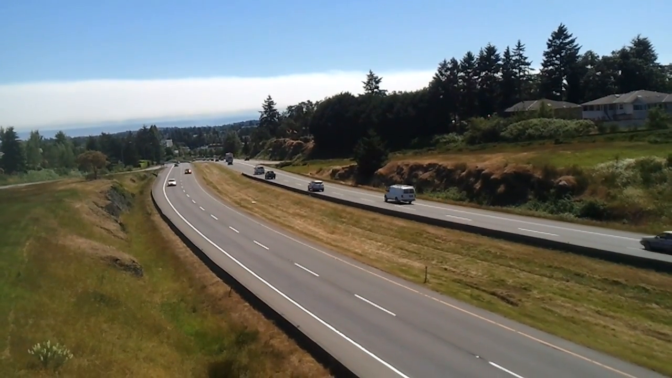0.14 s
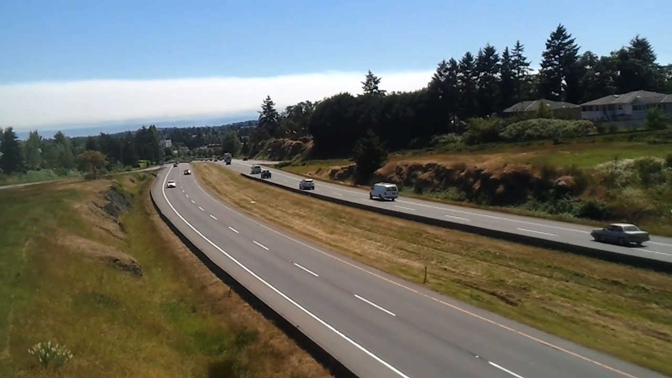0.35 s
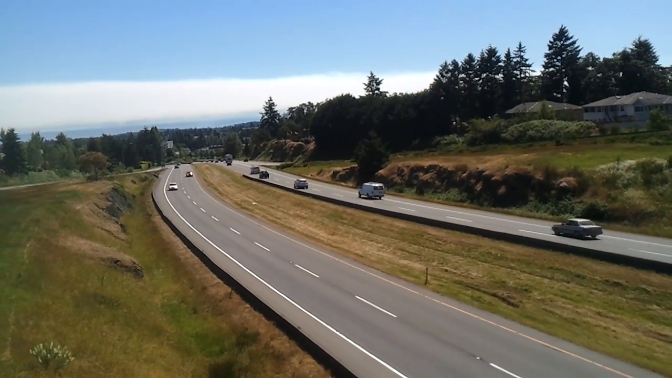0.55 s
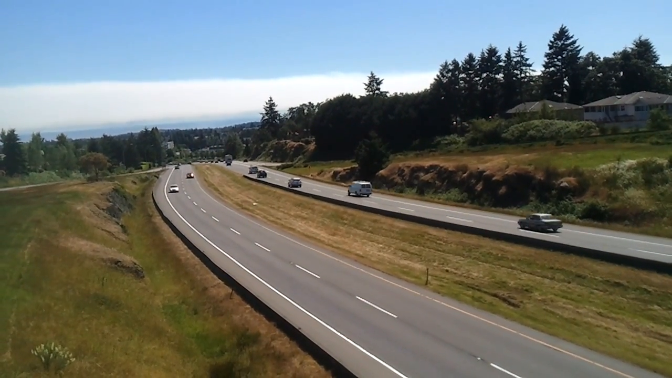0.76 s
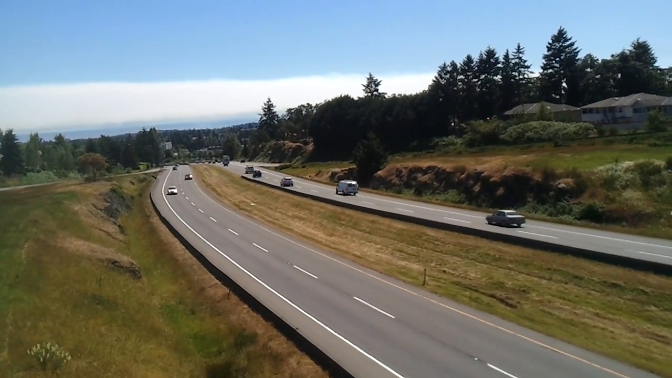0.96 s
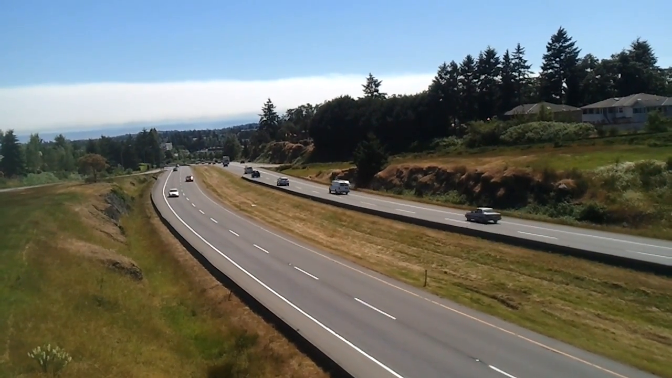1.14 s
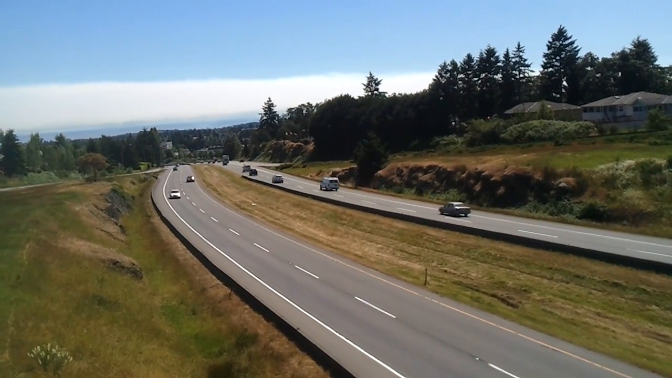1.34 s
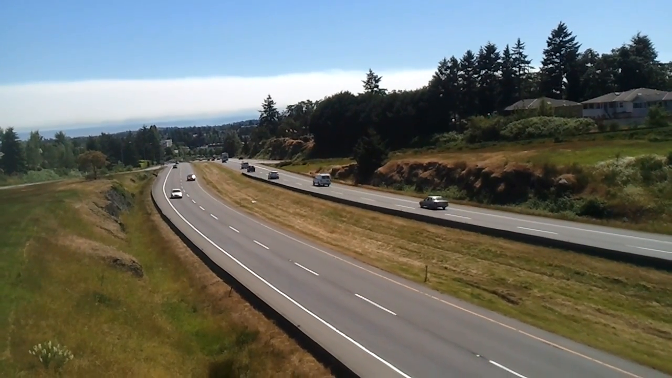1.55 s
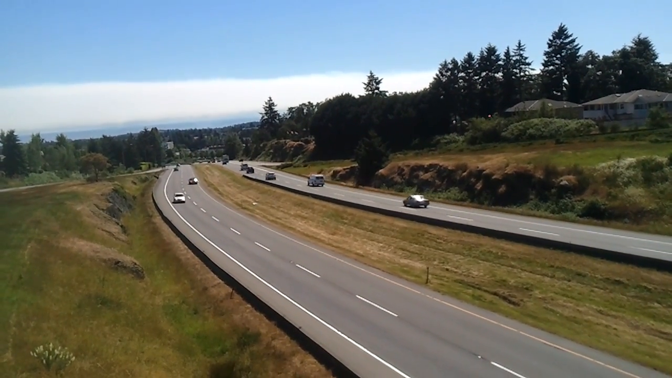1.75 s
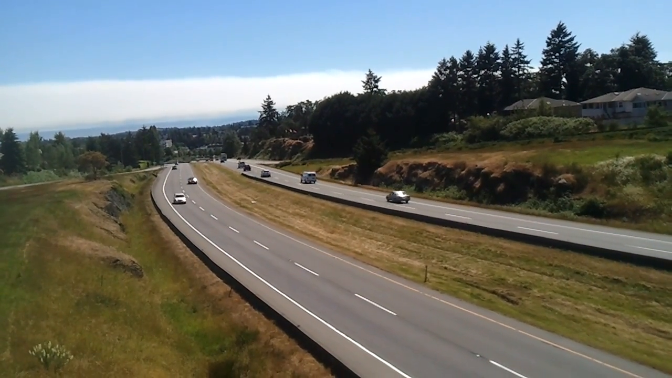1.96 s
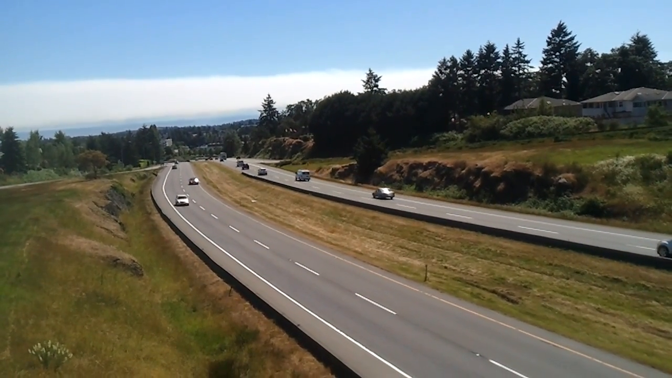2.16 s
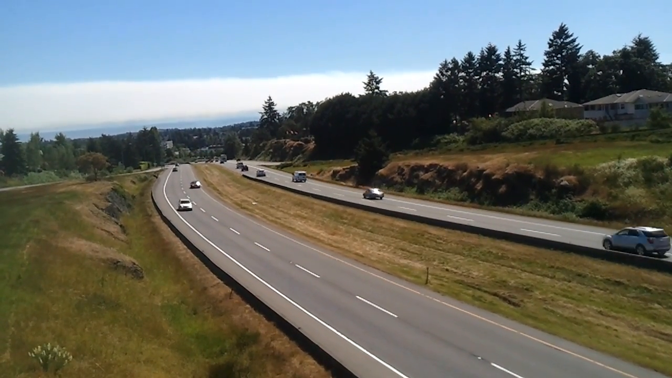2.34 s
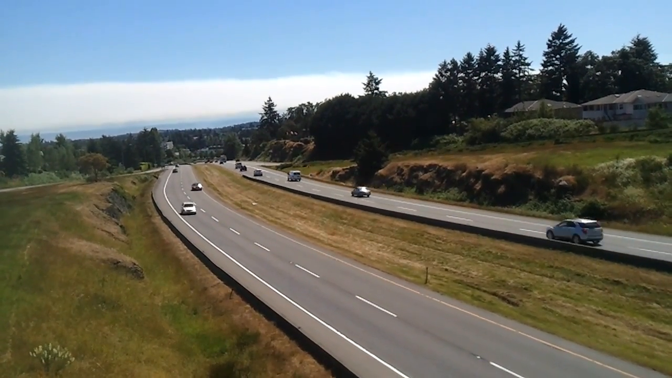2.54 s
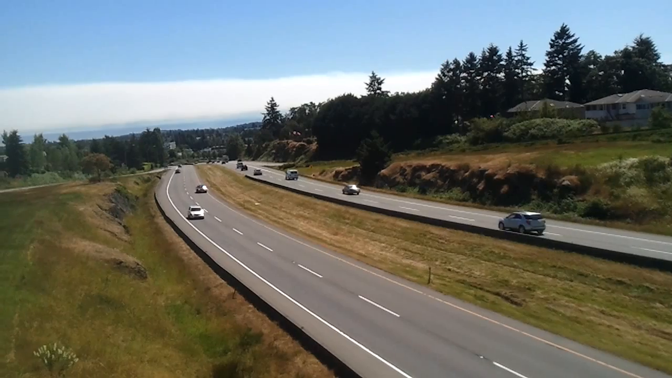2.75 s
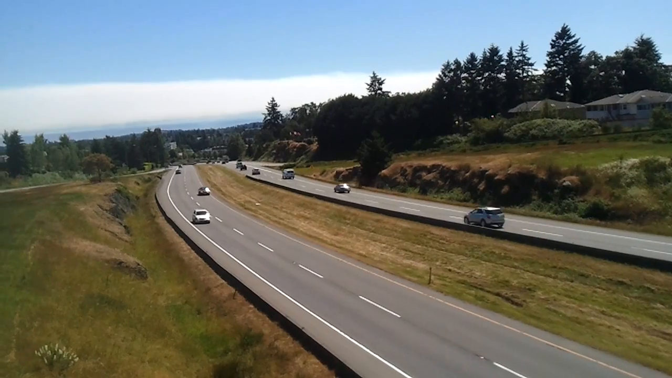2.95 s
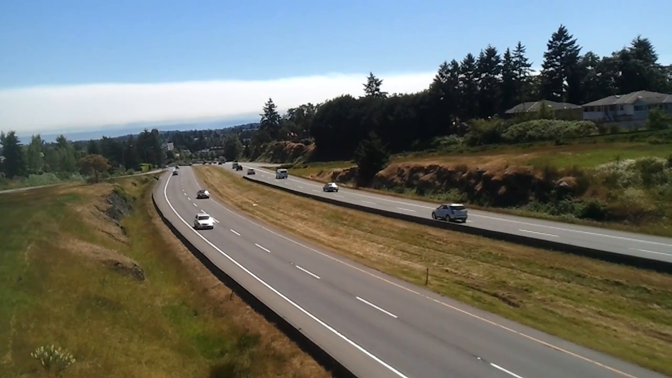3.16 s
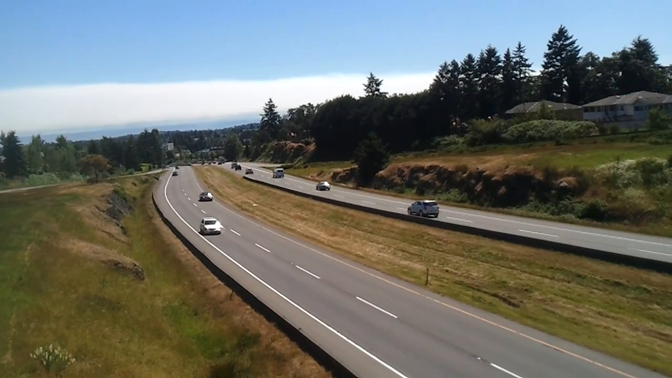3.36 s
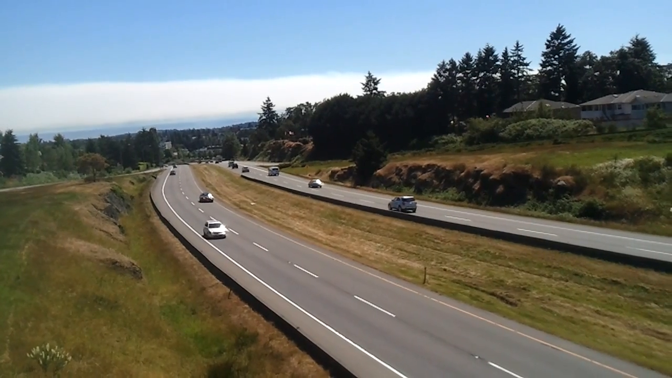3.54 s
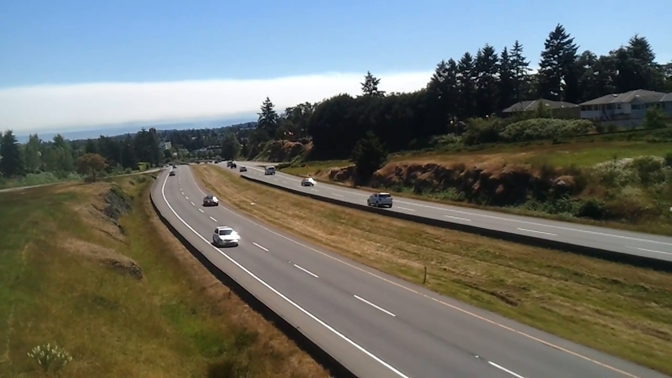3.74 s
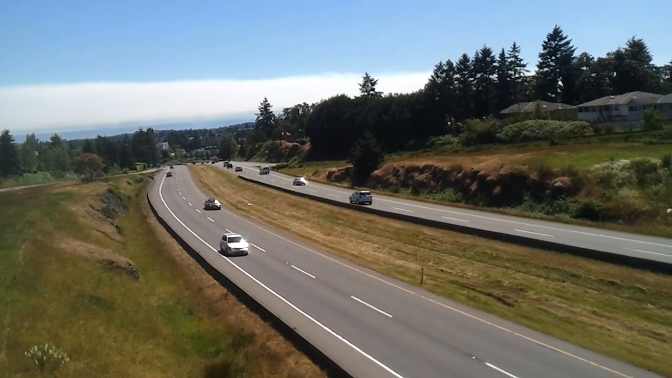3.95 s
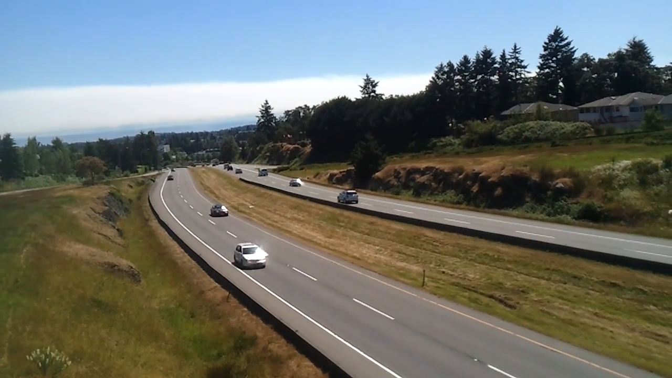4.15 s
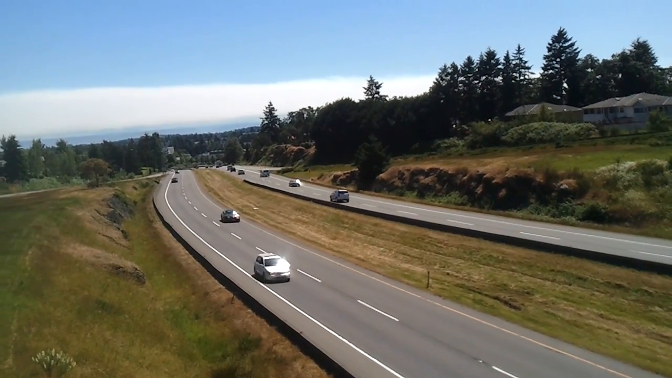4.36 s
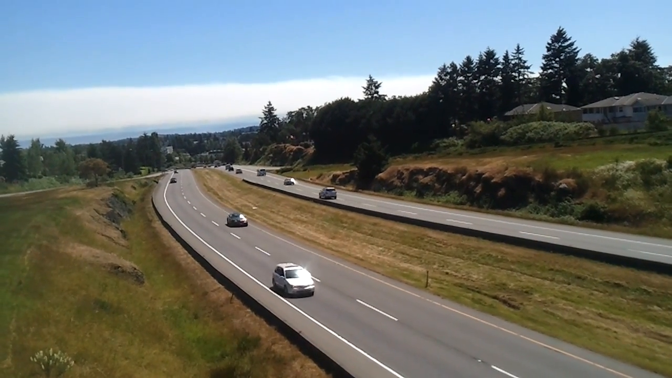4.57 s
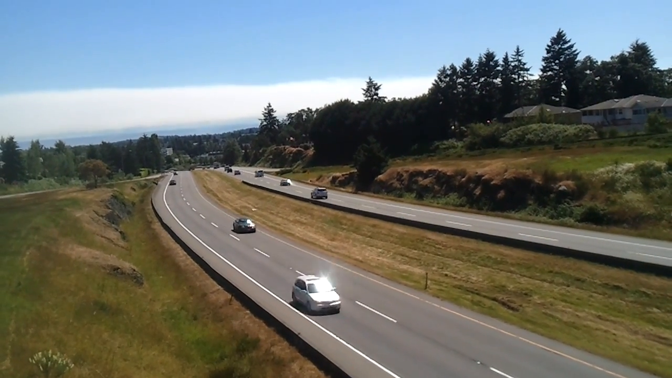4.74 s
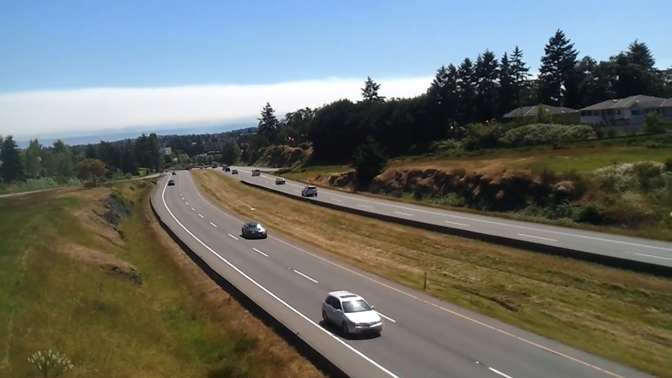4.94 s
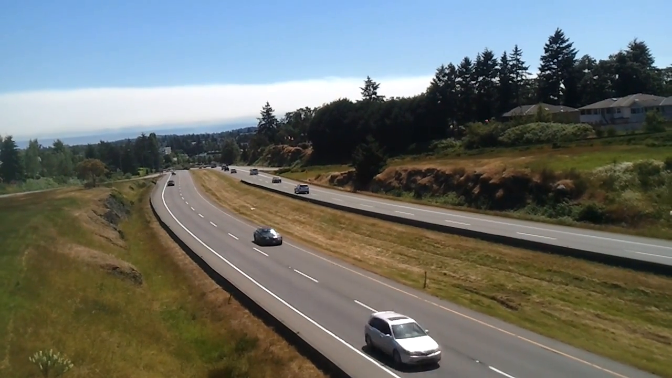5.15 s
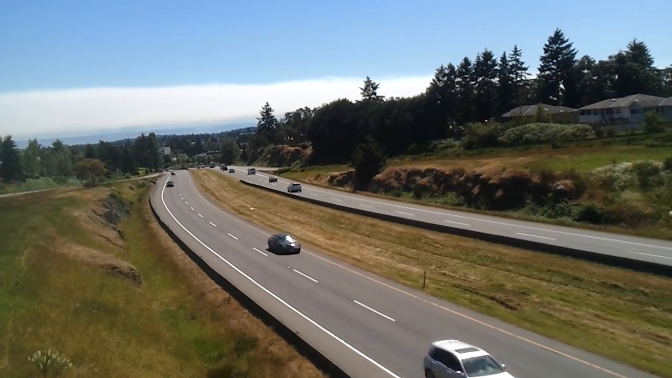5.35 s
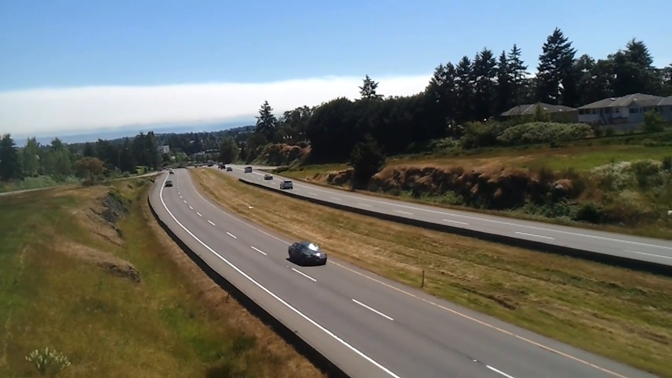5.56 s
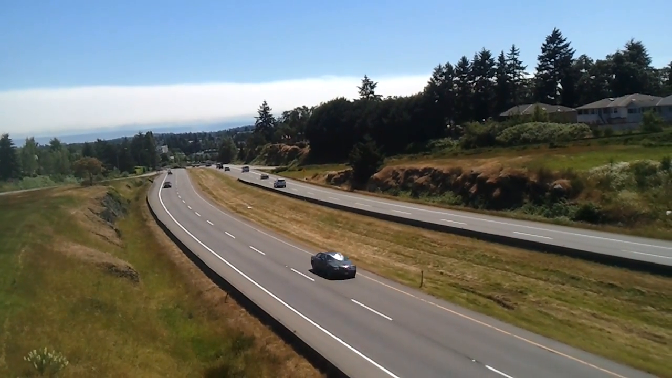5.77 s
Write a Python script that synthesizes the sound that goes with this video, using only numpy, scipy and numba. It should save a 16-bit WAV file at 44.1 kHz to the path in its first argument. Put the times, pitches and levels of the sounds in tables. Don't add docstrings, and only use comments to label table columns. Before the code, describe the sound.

A steady, broad wash of road noise from many cars, heard from a bridge over the road. A quick pass opens, a slower one follows near two seconds, then stronger tyre hiss later. Faint airy rustles come early. Low, blunt wind knocks strike the bare microphone throughout, thickening into rough, clipped buffeting in the second half.

```python
import sys
import numpy as np
from scipy import signal
from scipy.fft import rfft, irfft
from scipy.io import wavfile
from scipy.ndimage import uniform_filter1d
from numba import njit

SR = 44100
rng = np.random.default_rng(int(sys.argv[2]) if len(sys.argv) > 2 else 0)


def persist_wave(psi):
    counts = np.round(np.clip(psi, -1, 1) * 32767).astype(np.int16)
    wavfile.write(sys.argv[1], SR, np.atleast_2d(counts).T)


def boost_factor(decibels):
    exponent = np.asarray(decibels, float) / 20
    return 10 ** exponent


N = 255780
TIME = np.arange(N) / SR

# time_s, level_db
GUST = [(0, -27), (.27, -29), (.4, -20), (.8, -26), (1.85, -24.5), (2.36, -22.5), (2.6, -17.5), (2.79, -23),
        (3.1, -20.5), (3.33, -24.5), (3.9, -16.5), (4.15, -22), (4.35, -16.5), (4.56, -19.5), (4.95, -15.5),
        (5.45, -15.5), (5.68, -22.5), (5.8, -22.5)]
# start_s, front_db, swell_db, swell_ms
SNAPS = [(0.449, -14, -7, 7.8), (0.623, -11, -12.5, 18), (1.046, -8, -9, 22.4), (1.345, -4, -10, 18),
         (1.37, -12, -9, 12), (1.688, -4.5, -14, 15), (2.53, -12, -12.5, 26), (2.611, -1.5, -10.5, 13),
         (2.658, -19.5, -6, 10), (3.218, -18, -9, 13), (3.254, -3.5, -1.5, 21), (3.555, -0.5, -9, 9.2),
         (3.677, -2, -11.5, 14), (3.754, -2.5, -2.5, 8.4), (3.782, -2.5, -9, 25.5), (3.85, -4, -4, 8.6),
         (3.914, -8, -9.5, 10), (4.202, 0, -5, 14), (4.245, -12, -4, 15), (4.336, -7.5, -3, 9),
         (4.422, -5.5, -6, 35), (4.484, -0.5, -7.5, 8), (4.603, -0.5, -10, 18), (4.787, -14, -10.5, 8.9),
         (5.018, -3, -3.5, 11), (5.056, -1.5, -3.5, 8.1), (5.168, -9.5, -10, 8.3), (5.235, 0.5, -1, 14),
         (5.377, 5.5, -7, 18), (5.528, -1.5, -5.5, 12)]
FRONT_HZ = 540


def level(x, db):
    return x * boost_factor(db) / np.sqrt(np.mean(x ** 2))


@njit
def svf(x, hz, width):
    y = np.empty(len(x))
    band, low = 0., 0.
    for i in range(len(x)):
        g = np.tan(np.pi * hz[i] / SR)
        damping = width[i] / hz[i]
        v = (band + g * (x[i] - low)) / (1 + g * (g + damping))
        band, low = 2 * v - band, low + 2 * g * v
        y[i] = damping * v
    return y


def walk(rate):
    hold = int(SR / rate)
    steps = rng.standard_normal(N // 100)[np.arange(N) // hold]
    smooth = uniform_filter1d(uniform_filter1d(steps, hold), hold)
    return smooth / smooth.std()


def rush(spectrum, flicker_db):
    hz, db = np.transpose(spectrum)
    f = np.maximum(np.fft.rfftfreq(N, 1 / SR), 1)
    below = -12 * np.maximum(np.log2(hz[0] / f), 0)
    above = -60 * np.maximum(np.log2(f / hz[-1]), 0)
    colour_db = np.interp(np.log(f), np.log(hz), db) + below + above
    noise = rfft(rng.standard_normal(N)) * boost_factor(colour_db)
    octave = np.clip(np.log2(f / 125), 0, 6)
    total = np.zeros(N)
    for k in range(7):
        band = irfft(noise * np.maximum(1 - abs(octave - k), 0), N)
        total += band * boost_factor(flicker_db * walk(13))
    return level(total, 0)


def passes():
    # nearest_s, approach_s, retreat_s, hiss_db, tread_db
    cars = [
        (.13, 0.072, 0.054, -30.5, -23.5),
        (1.749, 0.58, .4, -33, -29.5),
        (2.3, 0.13, 0.18, -30.5, -32.5),
        (3.7, 0.37, .5, -22, -31),
        (4.35, 0.23, 0.16, -24.5, -28.5),
        (5.25, 0.31, 0.48, -27.5, -14.5),
        (5.75, .2, .3, -22, -20.5),
    ]
    s, come, go, hiss_db, tread_db = np.transpose(cars)[:, :, None]
    near = 1 / (1 + ((TIME - s) / np.where(TIME < s, come, go)) ** 2)
    hiss_power = np.sum(boost_factor(2 * hiss_db) * near, axis=0)
    tread_power = np.sum(boost_factor(2 * tread_db) * near, axis=0)
    far_db = -25 + 3 * near[-2:].max(axis=0)
    return far_db, 10 * np.log10(hiss_power), 10 * np.log10(tread_power)


def traffic():
    # band_hz, density_db (per Hz)
    far = [(40, -4.5), (80, 1.5), (200, -6.5), (500, -9), (900, -1.5), (1400, -4), (2200, -7),
           (2900, -16.5), (3900, -11), (4800, -12.5), (5300, -25), (6200, -29), (6900, -29.5),
           (8300, -38.5)]
    # band_hz, density_db (per Hz)
    below = [(300, -28.5), (700, -16.5), (1200, -2.5), (2200, -2), (2900, -11), (3500, -13), (3900, -4.5),
             (4300, -9), (4700, -22.5), (5100, -16.5), (5500, -23), (6000, -45.5), (7600, -32.5),
             (8300, -65)]
    tread_hz, tread_width_hz, notch_hz = 1532, 610, 1815
    far_db, hiss_db, tread_db = passes()
    centre = tread_hz * (1 + 0.042 * walk(2.91))
    width = np.full(N, tread_width_hz)
    tread = svf(svf(rng.standard_normal(N), centre, width), centre, width)
    cars = boost_factor(hiss_db) * rush(below, 1.22) + boost_factor(tread_db) * level(tread, -3.46)
    cars = cars - 0.26 * np.interp(TIME - 1 / notch_hz, TIME, cars)
    notch = np.full(N, 1. * notch_hz)
    cars = cars - 1.35 * svf(cars, notch, 0.12 * notch)
    return boost_factor(far_db) * rush(far, 0.31) + cars


def swells(s, db, spread, rise):
    power = np.zeros(N)
    for t, peak, fall in zip(s, boost_factor(2 * db), spread):
        near = slice(max(int((t - 4 * fall) * SR), 0), int((t + 4 * fall) * SR))
        late = TIME[near] - t
        side = np.where(late < 0, rise * fall, fall)
        power[near] += peak * np.exp(-.5 * (late / side) ** 2)
    return np.sqrt(power)


def rustle():
    # peak_s, peak_db, length_ms, pitch_hz
    puffs = [
        (.275, -46, 45, 6200),
        (.395, -37, 20, 5060),
        (.56, -45, 13, 5600),
        (2.518, -41, 3.6, 6930),
        (2.54, -43, 12, 5800),
    ]
    s, db, ms, hz = np.transpose(puffs)
    pitch = np.interp(TIME, s, hz)
    hiss = svf(svf(rng.standard_normal(N), pitch, .4 * pitch), pitch, .4 * pitch)
    return swells(s, db, 0.00067 * ms, 0.67) * level(hiss, 0)


def snaps():
    scatter = .1
    out = np.zeros(N)
    for (s, db, _, _), (turn, tune) in zip(SNAPS, rng.random((len(SNAPS), 2))):
        hz = FRONT_HZ * (1 + scatter * (2 * tune - 1))
        cycles = (TIME - s - .0025) * hz
        near = abs(cycles) < 5
        bell = np.exp(-(cycles[near] / 0.52) ** 2)
        out[near] += boost_factor(db - 0.5) * bell * np.cos(2 * np.pi * (cycles[near] + turn))
    return out


def eddies():
    # peak_s, peak_db, length_ms
    large = [(.3, -14.5, 22), (.366, -17.5, 28), (0.419, -14.5, 23), (.689, -9.5, 9.6), (0.851, -14, 17),
             (1.118, -15, 27), (1.161, -9.5, 15.4), (1.488, -9.5, 23), (2.14, -13.5, 18),
             (1.923, -16.5, 14), (1.975, -10.5, 16), (5.33, -9, 44), (2.69, -7, 10.7), (3.112, -11, 24),
             (3.386, -9.5, 15), (3.225, -10.5, 21), (3.448, -6.5, 8.5), (3.627, -11.5, 10.6),
             (3.7, -10.5, 45), (3.965, -5, 50), (4.039, -4.5, 13), (4.279, -8.5, 35), (4.384, -0.5, 6.1),
             (4.728, -11.5, 22), (4.834, -11, 58), (4.947, -2.5, 16), (5.432, -12, 54), (5.502, -3.5, 16),
             (5.571, 4.5, 7.8), (5.775, -9.5, 31)]
    small_per_s, small_db, small_scatter_db, small_ms = 32, 4, 1.5, 13
    full_scale_hz, hz_per_db, scatter = 383.4, 6.5, 0.05
    gust_hz_per_db = 4.5
    hard_lag = .4
    hard_share = .35

    count = int(small_per_s * N / SR)
    when = rng.random(count)
    size, span = rng.standard_normal((count, 2)).T
    s = (np.arange(count) + when) / small_per_s
    db = np.interp(s, *np.transpose(GUST)) + small_db + small_scatter_db * np.minimum(size, 1)
    small = np.transpose([s, db, small_ms * np.exp(0.31 * span)])
    hard = [(t + hard_lag * ms / 1000, swell_db, ms) for t, _, swell_db, ms in SNAPS]
    rows = np.vstack([small, large, hard])

    fast = gust_hz_per_db * (np.interp(rows[:, 0], *np.transpose(GUST)) + 20)
    hz = full_scale_hz + fast + hz_per_db * rows[:, 1]
    hz = hz * np.exp(scatter * rng.standard_normal(len(rows)))
    hz[-len(SNAPS):] += hard_share * (FRONT_HZ - hz[-len(SNAPS):])
    in_time = np.argsort(rows[:, 0])
    return np.column_stack([rows, np.maximum(hz, 120)])[in_time].T


def wind():
    s, db, ms, hz = eddies()
    spread = 0.00039 * np.sqrt(np.maximum(ms ** 2 - 40, 9))
    pitch = 0.79 * np.interp(TIME, s, hz)
    swirl = svf(svf(rng.standard_normal(N), pitch, 1.8 * pitch), pitch, 1.8 * pitch)
    swirl = signal.sosfilt(signal.butter(3, 1050, fs=SR, output="sos"), swirl)
    swirl = swirl / (uniform_filter1d(swirl ** 2, size=300) + 1e-9) ** 0.57
    flutter = boost_factor(3.2 * walk(150))
    thumps = swells(s - .001, db - 2.5, spread, 0.73) * flutter * level(swirl, 0)

    low = np.full(N, 210.)
    drag = svf(svf(rng.standard_normal(N), low, 1.13 * low), low, 3.2 * low)
    breeze = boost_factor(np.interp(TIME, *np.transpose(GUST)) + 0.9 * walk(45))
    return thumps + breeze * level(drag, -3.1)


def scene():
    return (traffic() + rustle() + snaps() + wind())[None]


def roll_off(x):
    return signal.sosfilt(signal.butter(12, 15870, fs=SR, output="sos"), x)


def record(dry):
    clip, top_hz, sag_s = .712, 8044, 0.004
    x = signal.sosfilt(signal.butter(2, 45., "high", fs=SR, output="sos"), dry)
    keep = np.exp(-1 / (sag_s * SR))
    overload = signal.lfilter([1 - keep], [1, -keep], np.clip(abs(x) - clip, 0, .15))
    x = x / (1 + 11.0 * overload)
    flat = np.clip(x, -.99 * clip, .99 * clip)
    narrow = signal.sosfilt(signal.ellip(10, .2, 80, top_hz, fs=SR, output="sos"), flat)
    return roll_off(np.clip(narrow, -clip, clip))


dry = scene()
out = record(dry)
persist_wave(out)
```